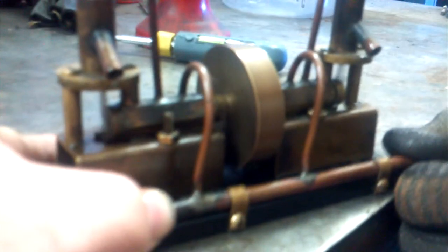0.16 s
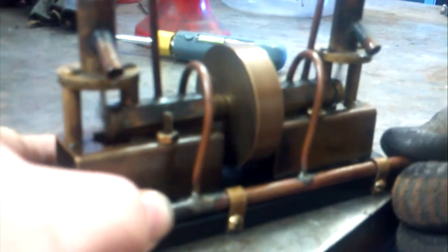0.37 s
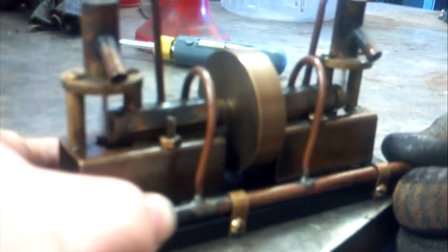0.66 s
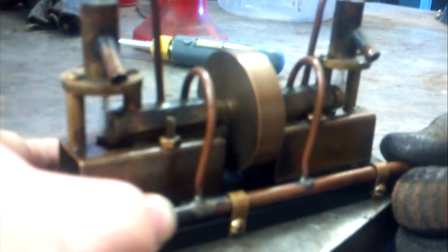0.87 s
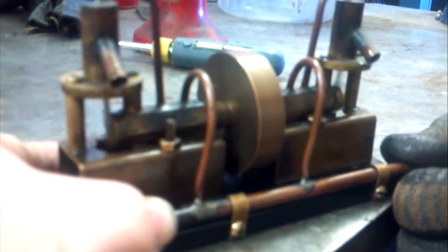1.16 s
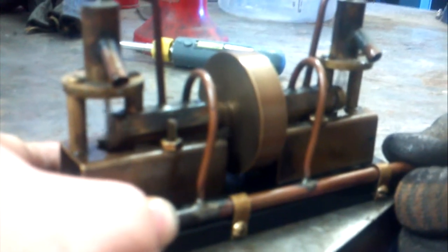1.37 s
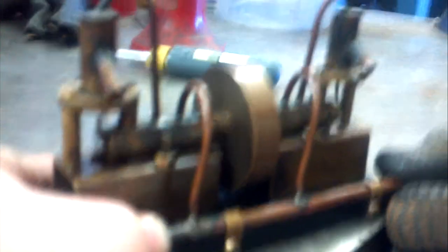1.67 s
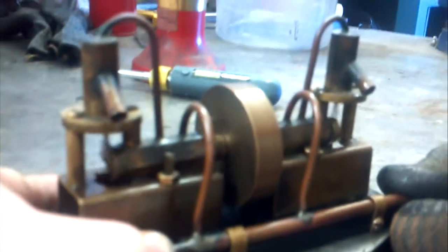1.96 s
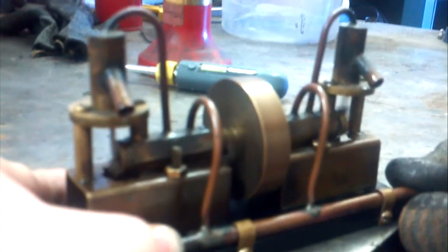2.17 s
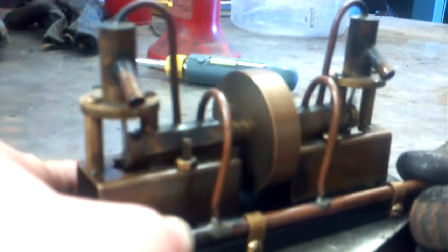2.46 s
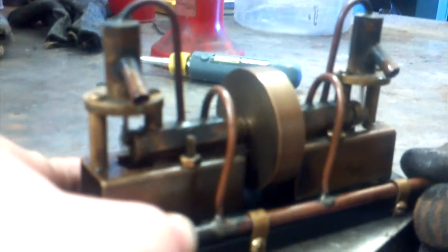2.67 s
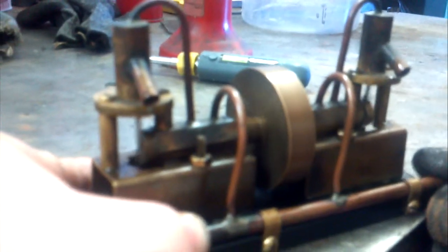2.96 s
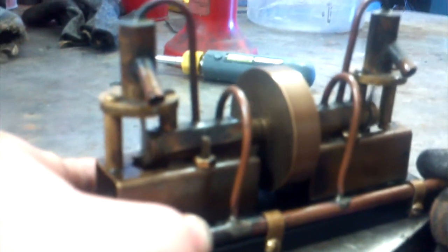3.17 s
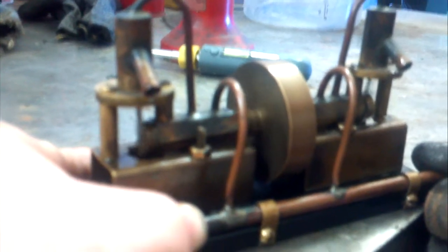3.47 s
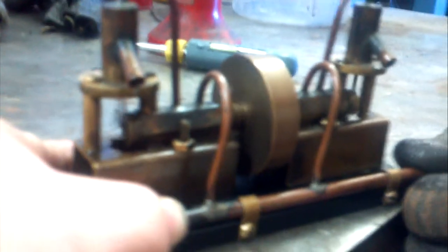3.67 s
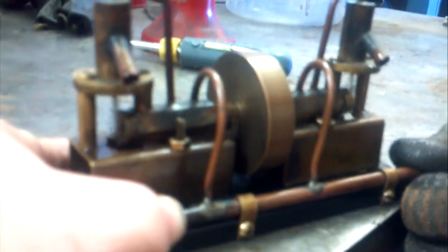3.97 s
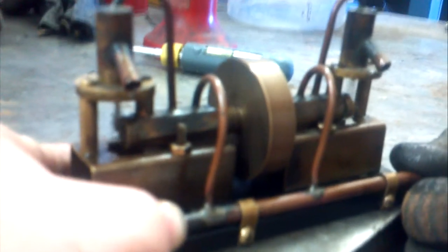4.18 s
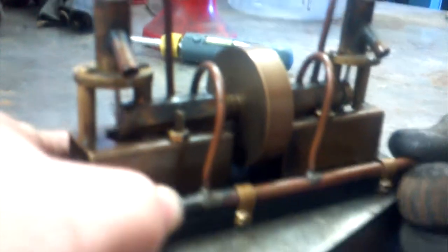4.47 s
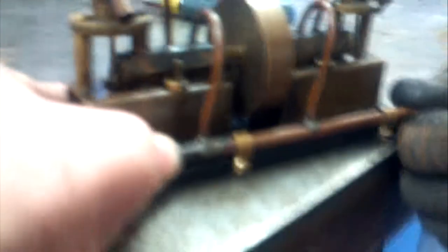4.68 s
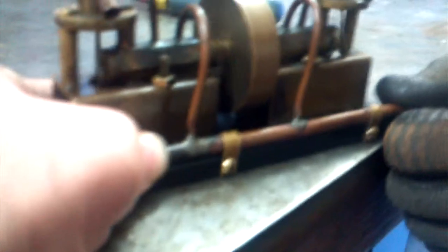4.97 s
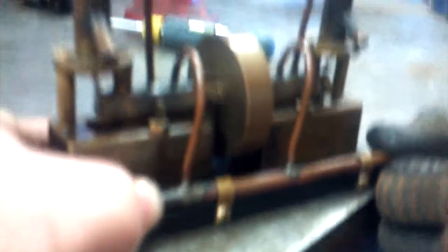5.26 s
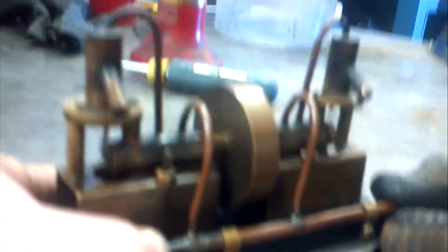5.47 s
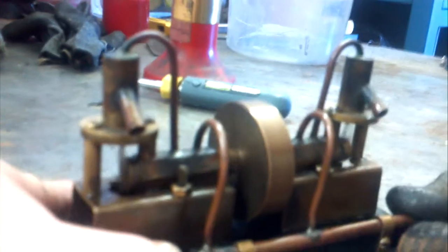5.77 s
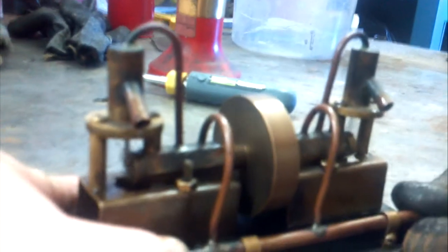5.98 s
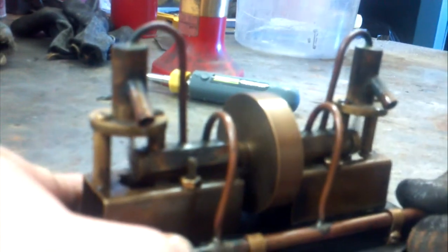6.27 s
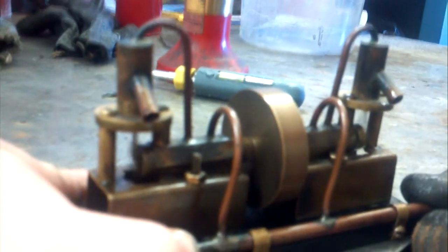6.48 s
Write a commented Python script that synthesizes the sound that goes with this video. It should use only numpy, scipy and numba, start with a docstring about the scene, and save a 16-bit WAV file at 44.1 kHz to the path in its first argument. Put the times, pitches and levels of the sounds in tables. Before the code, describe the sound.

Close on a workbench, a tiny two-cylinder engine runs on compressed air. Each turn gives a sharp spitting, whistling puff, a dull thump, then a softer hiss. The fast chuffing slows markedly by about two seconds, a hand knocks it and the leaking air flares briefly, then it accelerates steadily. Constant bright hiss and small linkage ticks continue; a faint whine rises near the end. Wide stereo, very close microphone.

```python
"""On a workshop bench, close to a phone with two microphone ports, a two-cylinder model engine runs on compressed air.
Each turn the near exhaust spits, whistles and shuts with a thump; half a turn later the far one hisses more softly.
The engine slows until 2.4 s, where a hand bumps it and the air leak swells briefly; then it picks up to the end.
From 5 s a faint whine climbs. Jets and leak are coloured noise, whistles noisy tones, knocks decaying modes;
linkage knocks, the leak's hiss and a low rumble run throughout."""
import sys
import numpy as np
from scipy import signal
from scipy.fft import rfft, irfft
from scipy.io import wavfile
from scipy.ndimage import uniform_filter1d
from numba import njit

SR = 44100
rng = np.random.default_rng(int(sys.argv[2]) if len(sys.argv) > 2 else 0)


def put_to_file(sound):
    """Save the sound as 16-bit audio at rate SR, in the file named by the first command-line argument."""
    columns = np.atleast_2d(sound).T  # one column per channel
    safe = np.clip(columns, -1, 1)
    whole_steps = np.round(safe * 32767)
    wavfile.write(sys.argv[1], SR, whole_steps.astype(np.int16))


N = 291845
TIME = np.arange(N) / SR
FREQ = np.fft.rfftfreq(N, 1 / SR)


def undb(db):
    """Amplitude of a level in dB."""
    return 10 ** (np.asarray(db) / 20)


def unit(x):
    """The sound scaled to rms 1."""
    return x / np.sqrt(np.mean(x ** 2, axis=-1, keepdims=True))


@njit
def svf(x, hz, width):
    """State-variable band-pass with a moving centre, gain 1 at the centre."""
    y, band, low = np.empty(len(x)), 0., 0.
    for i in range(len(x)):
        g, k = np.tan(np.pi * hz[i] / SR), width / hz[i]
        v = (band + g * (x[i] - low)) / (1 + g * (g + k))
        band, low, y[i] = 2 * v - band, low + 2 * g * v, k * v
    return y


def walk(rate):
    """Random levels held 1 / rate s and slewed twice; spread near 1."""
    hold = int(SR / rate)
    steps = np.repeat(rng.standard_normal(N // hold + 1), hold)
    return 1.18 * uniform_filter1d(uniform_filter1d(steps, hold), hold)[:N]


def over_log_frequency(points, column):
    """A table column interpolated over the logarithm of frequency."""
    points = np.array(points)
    return np.interp(np.log(FREQ + 1), np.log(points[:, 0]), points[:, column])


def shape(points, column=1):
    """Gain over frequency from (frequency [Hz], level [dB], ..) points."""
    return undb(over_log_frequency(points, column))


def resonances(modes):
    """Gain over frequency of (frequency [Hz], width [Hz], level [dB]) resonances whose powers add."""
    return np.sqrt(sum(undb(2 * db) / (1 + (2 * (FREQ - hz) / width) ** 2) ** 2 for hz, width, db in modes))


def hiss(gain):
    """Two unrelated noises of the same colour, rms 1."""
    return unit(irfft(rfft(rng.standard_normal((2, N))) * gain, N))


def whistle(hz, width_hz, pure_db=-40.0):
    """Two unrelated noisy tones that follow a pitch, with a steady core, rms 1."""
    skirt = []
    for _ in range(2):
        narrowed = svf(rng.standard_normal(N), hz, width_hz)
        skirt.append(svf(narrowed, hz, width_hz))
    core = np.sin(2 * np.pi * (np.cumsum(hz) / SR + rng.random((2, 1))))
    return unit(unit(np.array(skirt)) + undb(pure_db) * np.sqrt(2) * core)


def ring(times, db, hz, t60):
    """One short mode struck at the given times, each blow with its own level and pitch."""
    t, out = np.arange(int(.14 * SR)) / SR, np.zeros(N + SR)
    push_cycles = 0.34  # a blow builds over this share of a cycle of its mode
    decay = np.exp(-np.log(1000) * t / t60)
    for at, gain, f in zip(*np.broadcast_arrays(np.atleast_1d(times), undb(db), hz)):
        if 0 <= at * SR < N:
            push = 1 - np.exp(-f * t / push_cycles)
            out[int(at * SR):][:len(t)] += gain * push * np.sin(2 * np.pi * f * t) * decay
    return out[:N]


# crank speed; a turn starts as the near exhaust opens: (time [s], speed [turns/s])
SPEED = [(0, 15.858), (1.05, 14.656), (1.45, 13.024), (2.02, 8.023), (2.38, 6.101), (3.17, 9.793),
         (3.55, 10.804), (4.1, 12.575), (4.8, 13.339), (5.7, 15.906), (6.38, 16.471), (6.62, 17.487)]
START_TURN = .627  # share of a turn already done at 0 s


def crank():
    """Start time of every turn, and the crank angle in turns at every sample: the running sum of speed."""
    time = np.arange(-SR // 10, N + SR // 5) / SR  # begins 0.1 s early
    angle = np.cumsum(np.interp(time, *np.transpose(SPEED))) / SR
    angle += START_TURN - angle[SR // 10]
    angle_now = angle[SR // 10:][:N]
    return np.interp(np.arange(int(angle_now[-1]) + 3), angle, time), angle_now


# slow drift of the near exhaust, whistle pitch before its bend:
# (time [s], jet level [dB], whistle level [dB], whistle pitch [Hz])
NEAR_DRIFT = [(0, -20, -20, 5950), (0.251, -21, -20, 5700), (.5, -20, -18, 5950), (1.001, -21, -25, 5850),
              (1.14, -22.5, -17, 5500), (1.24, -21.5, -24, 6400), (1.7, -23, -23, 6450),
              (2.128, -19.5, -25, 6250), (2.27, -18.5, -19, 5250), (2.43, -18, -15.5, 7307),
              (2.58, -20.5, -15, 6750), (2.85, -19.5, -12, 6900), (3.2, -21.5, -17, 6450),
              (4.0, -19.5, -14, 6450), (4.25, -21.5, -21, 6000), (4.7, -21, -18, 6200),
              (5.0, -20, -15.5, 6500), (5.55, -20.5, -12.5, 6550), (5.849, -21.5, -20.5, 6050),
              (6.2, -21, -18, 6250), (6.62, -21, -16, 6450)]
# turn-to-turn spread: (open time [share of turn], jet [dB], whistle [dB], whistle pitch [ratio],
# far jet [dB], thump [dB])
TURN_SCATTER = (0.012, 0.5, 1.2, 0.015, 0.8, 0.5)
OPEN_SHARE, FAR_DB = .348, -30.5  # share of a turn that the near port stays open; far jet level
THUMP_DB, THUMP_DB_PER_OCTAVE = -47.5, 6  # at 15 turns a second; gain as the speed doubles


def turns(starts):
    """What each turn brings: open share, jet dB, whistle dB, whistle Hz, far jet dB, thump dB."""
    chance = rng.standard_normal((len(starts) - 1, len(TURN_SCATTER))).T * np.array(TURN_SCATTER)[:, None]
    at, *columns = np.transpose(NEAR_DRIFT)
    jet_db, whistle_db, hz = (np.interp(starts[:-1], at, c) for c in columns)
    thump_db = THUMP_DB + THUMP_DB_PER_OCTAVE * np.log2(1 / (15 * np.diff(starts)))
    return np.array([OPEN_SHARE + chance[0], jet_db + chance[1], whistle_db + chance[2],
                     hz * (1 + chance[3]), FAR_DB + chance[4], thump_db + chance[5]])


# jet and spit burst, sag, and keep a tail as the port shuts:
# (time [share of open time], jet level [dB], spit level [dB])
NEAR_PORT = [(-.07, -9, -18), (-.03, -6, -12), (.05, 2, -2), (.16, 1.2, 0), (.36, 3, -2), (.56, -0.5, -5.5),
             (.78, -2, -7.5), (.9, -4, -8), (1.0, -9, -18), (1.08, -10.5, -17.5)]
# colour of the broad jet: (frequency [Hz], width [Hz], level [dB])
NEAR_PIPE = [(4710, 440, -8), (5420, 480, 0), (6650, 970, 1.5), (12220, 1300, -0.5), (13700, 1550, 1),
             (16000, 1440, 3.5)]
# colour of the spit: (frequency [Hz], width [Hz], level [dB])
NEAR_SPIT = [(9550, 910, 5), (10670, 2600, 1)]
# the whistle climbs as the port narrows, then drops as it shuts: (time [share of open time], pitch [ratio])
WHISTLE_BEND = [(0, .96), (.58, .96), (.74, 1.01), (.9, .98), (1, .9)]
# the whistle swells late: peak as share of open time, slope per open time, floor of the swell
WHISTLE_PEAK, WHISTLE_RISE_DB, WHISTLE_EARLY_DB = 0.74, 49, -15
# a last low chirp as the port shuts: share of open time, level, fall per open time, pitch
SHUT_CHIRP_AT, SHUT_CHIRP_DB, SHUT_CHIRP_FALL_DB, SHUT_CHIRP_HZ = .85, -4.5, 150, 4885
WHISTLE_PURE_DB = -1.5  # steady tone at the core of the whistle, against its noisy skirt


def near_exhaust(angle, each):
    """Broad jet, a spit at opening and a port whistle that drops in pitch as the valve shuts."""
    turn = (angle + .05).astype(int)  # the air stirs a little before the port opens
    open_share, jet_db, whistle_db, hz = each[:4, turn]
    opened = (angle - turn) / open_share
    at, *columns = np.transpose(NEAR_PORT)
    jet, spit = (np.interp(opened, at, c) for c in columns)
    sputter = 1.3 * walk(400)  # turbulence breaks the jet into millisecond bursts
    out = undb(jet_db + jet + sputter) * hiss(resonances(NEAR_PIPE))
    out += undb(jet_db + spit + sputter) * hiss(resonances(NEAR_SPIT))

    chirp = SHUT_CHIRP_DB - SHUT_CHIRP_FALL_DB * np.abs(opened - SHUT_CHIRP_AT)
    chirp_hz = SHUT_CHIRP_HZ * (1 - 0.5 * np.clip(opened - SHUT_CHIRP_AT, -.2, .2))
    out += undb(jet_db + chirp) * whistle(chirp_hz, 1600.0, WHISTLE_PURE_DB)

    swell = np.maximum(1.5 - WHISTLE_RISE_DB * np.abs(opened - WHISTLE_PEAK), WHISTLE_EARLY_DB)
    gate = np.interp(opened, [-.08, 0.018, 1.37], [-30, -5.0, -1.0])
    gate = np.where(opened > .98, -41, gate)  # cut off as the port shuts
    pitch = hz * np.interp(opened, *np.transpose(WHISTLE_BEND)) * (1 + 0.013 * walk(200))
    level_db = whistle_db + swell + gate + 0.77 * walk(300)
    return out + undb(level_db) * whistle(pitch, 500.0, WHISTLE_PURE_DB)


# the far port over a turn, levels relative to each other:
# (time [share of turn], jet level [dB], pipe tone level [dB], whistle level [dB], whistle pitch [Hz])
FAR_PORT = [(.46, -30, -30, -30, 4300), (.5, -1, -1, -22, 4300), (.52, .5, 3, -20, 4300),
            (.57, -1, -.5, -19, 4350), (.65, -1, -3.5, -15, 4500), (.74, -1, 0, -11, 4900),
            (.8, 1.5, 1, -8, 6000), (.84, -3, -3, -7, 6900), (.88, -30, -30, -30, 7000)]
# colour of the far jet: (frequency [Hz], width [Hz], level [dB])
FAR_PIPE = [(12340, 1300, 21), (14600, 1000, 23)]


def far_exhaust(angle, each):
    """Softer jet with a steady pipe tone of narrow noise and a faint rising whistle."""
    turn = angle.astype(int)
    level_db = each[4, turn] + 1.3 * walk(280)
    at, *columns = np.transpose(FAR_PORT)
    jet, tone, chirp, hz = (np.interp(angle - turn, at, c) for c in columns)
    out = undb(jet - 0.5) * hiss(resonances(FAR_PIPE))
    out += undb(tone + 1.0) * hiss(resonances([(9910, 880, 0)]))
    out += undb(chirp + 3.0) * whistle(hz, 590.0)
    return undb(level_db) * out


def strike_each_turn(starts, share, strength_db, scatter_db, hz, t60):
    """One mode struck once a turn, with a little scatter in time and level."""
    period = np.diff(starts)
    chance = rng.standard_normal((2, len(period)))
    times = starts[:-1] + period * (share + 0.0024 * chance[0])
    return ring(times, strength_db + scatter_db * chance[1], hz, t60)


# pressure blows each turn, timing and pitch as at 15 turns a second: (time [share of turn],
# frequency [Hz], decay t60 [s], level over the thump level [dB], scatter [dB])
BLOWS = [(.31, 214, 0.037, 2.5, 1.5), (.31, 158, 0.044, 15, 1), (.31, 123, 0.05, 0, 1.5),
         (.97, 150, 0.045, 8, 3), (.12, 155, 0.035, 4, 1), (.53, 155, .03, -2, -1)]
BLOW_PITCH_LAW = 0.5  # blows ring lower as the engine slows: pitch goes with speed to this power
BLOW_LAG_PER_OCTAVE = 0.103  # blows land later in the turn as the speed halves, share of turn


def pressure_thumps(starts, thump_db):
    """Low modes pushed by the pressure blows; they ring lower and land later as the engine slows."""
    slowness = 15 * np.diff(starts)
    lag = BLOW_LAG_PER_OCTAVE * np.log2(slowness)
    pitch = slowness ** -BLOW_PITCH_LAW
    return sum(strike_each_turn(starts, share + lag, thump_db + db, scatter_db, hz * pitch, t60)
               for share, hz, t60, db, scatter_db in BLOWS)


# linkage knocks each turn: (time [share of turn], frequency [Hz], decay t60 [s],
# level at 15 turns a second [dB], scatter [dB])
KNOCKS = [(.868, 472, 0.02, -35, 0.5), (.87, 810, 0.013, -36, 1.5), (.47, 404, 0.021, -39, 2.5),
          (.335, 370, 0.015, -45, 1), (.4, 2250, 0.007, -36, 4.5)]


def linkage_knocks(starts):
    """Short modes struck near fixed crank angles; the knocks harden with speed."""
    speed_db = -14 * np.log10(15 * np.diff(starts))
    return sum(strike_each_turn(starts, share, speed_db + db, scatter_db, hz, t60)
               for share, hz, t60, db, scatter_db in KNOCKS)


def bench(blows):
    """The bench radiates little of the thumps and knocks below 84 Hz: a steep high-pass."""
    return signal.sosfilt(signal.butter(4, 84, "high", fs=SR, output="sos"), blows)


# modes struck by a hand bump: (time [s], frequency [Hz], decay t60 [s], level [dB])
HAND_BUMP = [(2.105, 480, .025, -36), (2.106, 690, .02, -38), (2.255, 426, 0.028, -34),
             (2.41, 286.2, 0.056, -31.5), (2.431, 560, 0.018, -36), (2.442, 130, 0.029, -27)]


def hand_bump():
    """A hand bumps the engine: a few single decaying modes."""
    return sum(ring(at, db, hz, t60) for at, hz, t60, db in HAND_BUMP)


# drift of the leak, before fixed offsets: (time [s], body level [dB], treble level [dB])
LEAK = [(0, -41, -34), (1.0, -40, -33.5), (1.45, -42.5, -38), (1.88, -43.5, -39), (2.0, -41, -37),
        (2.3, -38.5, -34.5), (2.6, -39, -36.5), (3.6, -38.5, -34), (4.4, -40, -35), (5.099, -39, -33.5),
        (6.0, -39.5, -35.5), (6.62, -38.5, -34)]
# broad colour of the body: (frequency [Hz], level [dB])
LEAK_BODY = [(40, -27), (90, -16), (130, -9), (300, -4), (700, -6), (1200, -9), (1900, -2.5), (2250, -1.5),
             (2750, -6.5), (3050, -1.5), (3400, -.5), (3700, 0), (4100, -1.5), (5000, -6.5)]
# ringing of the hollow base: (frequency [Hz], width [Hz], level [dB])
LEAK_RINGS = [(620, 90, -18), (937, 45, -14), (1065, 90, -11), (1478, 90, -12.5), (1700, 260, -11),
              (2150, 300, -11)]
# colour of the treble hiss: (frequency [Hz], level [dB])
LEAK_TREBLE = [(3800, -28.5), (4800, 4.5), (6200, 10), (8000, 7), (9900, 11.5), (11500, 10.5), (13500, 1),
               (16000, 2.5)]
# gain on the leak's lows: (time [s], level [dB])
LEAK_LOWS = [(0, 3.5), (1.8, 2), (2.1, -1.5), (3.6, -2), (4.5, -1), (6.62, -1)]
# start and end of the swell while the engine is slowest: (start [s], end [s])
GUST_S = (2.33, 2.435)
GUST_BODY_DB, GUST_TREBLE_DB, GUST_EDGE_S = 3.2, 11, 0.012


def leak():
    """Steady escaping air, wavering a little: a body coloured by the hollow base, and a treble hiss."""
    at, body_db, treble_db = np.transpose(LEAK)
    gust = np.clip(np.minimum(TIME - GUST_S[0], GUST_S[1] - TIME) / GUST_EDGE_S + .5, 0, 1)
    body = hiss(shape(LEAK_BODY)) + hiss(resonances(LEAK_RINGS)) * undb(-11)
    lows = signal.sosfilt(signal.butter(2, 1100, fs=SR, output="sos"), body)  # under 1100 Hz
    body = body + lows * (undb(np.interp(TIME, *np.transpose(LEAK_LOWS))) - 1)
    body *= undb(np.interp(TIME, at, body_db) + GUST_BODY_DB * gust + 5.5 + 1.27 * walk(45))

    treble_gust_db = GUST_TREBLE_DB * gust * np.interp(TIME, GUST_S, [0.4, 1])  # the gust grows
    treble_level_db = np.interp(TIME, at, treble_db) + treble_gust_db + 3.5 + 2.14 * walk(40)
    return body, hiss(shape(LEAK_TREBLE)) * undb(treble_level_db)


# faint whine, pitch of the upper tone, level before an offset: (time [s], frequency [Hz], level [dB])
WHINE = [(5.1, 700, -80), (5.6, 724, -60), (6.1, 750, -58), (6.62, 780, -58)]


def whine():
    """Two thin sine tones about a third apart that rise together."""
    at, hz, db = np.transpose(WHINE)
    phase = 2 * np.pi * np.cumsum(np.interp(TIME, at, hz)) / SR
    level_db = np.interp(TIME, at, db) - 0.3 + .8 * walk(6)
    return undb(level_db) * (np.sin(phase) + 1.3 * np.sin(0.823 * phase))


# colour of the rumble: (frequency [Hz], level [dB])
RUMBLE = [(20, 3), (100, -10), (300, -12), (1000, -64)]
RUMBLE_DB, RUMBLE_DB_PER_OCTAVE = -71, 3  # rms at 15 turns a second; gain as the speed doubles


def rumble():
    """A faint low rumble of noise, unlike in the two channels, that grows with the speed."""
    speed = np.interp(TIME, *np.transpose(SPEED))
    return undb(RUMBLE_DB + RUMBLE_DB_PER_OCTAVE * np.log2(speed / 15)) * hiss(shape(RUMBLE))


def ports(pair, rear, lead=0):
    """The front port hears the first sound; the rear hears it shaded and shifted, plus scattered like sound."""
    phase = over_log_frequency(rear, 3) + 2 * np.pi * FREQ * lead / SR
    shared = rfft(pair[0]) * shape(rear) * np.exp(1j * phase)
    scattered = rfft(pair[1]) * shape(rear, column=2)
    return np.array([pair[0], irfft(shared + scattered, N)])


# rear microphone port against the front, for jets and treble hiss:
# (frequency [Hz], shared level [dB], unrelated level [dB], phase of shared part [rad])
REAR_JET = [(4500, -8, -3, 0), (5600, -10, -7, 0), (6200, -6, -11, 0), (7600, -13, -5, 0),
            (9000, -14, -7, 0), (10300, -11.5, -10, 0), (16000, -10.5, -8, 0)]
# the same for the leak's body, thumps, knocks and whine:
# (frequency [Hz], shared level [dB], unrelated level [dB], phase of shared part [rad])
REAR_BODY = [(30, -6, -2, 0), (130, -3.5, -10, -.42), (350, -3, -6, -.3), (500, -7, -8, -.3),
             (800, -6, -10, .2), (1100, -3, -7, 1.), (1650, -3, -2, -1.6), (2000, -5, -4, -2.3),
             (2300, -5, -4, -2.8), (2420, -1.5, -12, -3.1), (2560, -1, -14, -3.14), (2630, 0, -34, -3.14),
             (2880, 0, -34, -3.14), (2960, -3, -7, -3.1), (3120, -6, -3, -3.1), (3500, -8, -2, -3.1),
             (5000, -10, -2, -3.1)]
JET_LEAD = 16.3  # samples by which the rear port hears the jets first


def scene():
    """The engine and its leak on the bench, as heard at the front and rear microphone ports."""
    starts, angle = crank()
    each = turns(starts)
    body, treble = leak()
    jets = undb(-2.0) * (near_exhaust(angle, each) + far_exhaust(angle, each)) + treble
    body[0] += bench(pressure_thumps(starts, each[5]) + linkage_knocks(starts))
    body[0] += hand_bump() + whine()
    return ports(jets, REAR_JET, JET_LEAD) + ports(body, REAR_BODY)


# the delayed port cancels less well in the treble: (frequency [Hz], level [dB])
BEAM_MATCH = [(4500, 0), (5300, -1.5), (9000, -1.5), (16000, -0.5)]
BEAM_DELAY, TOP_HZ = 16, 15750  # samples; upper band edge
RIGHT_DB = 0.15  # the right channel is a little louder


def record(dry):
    """Each channel is one port minus the other delayed, which widens the image; a low rumble joins, the top is cut."""
    late = np.pad(dry[::-1], ((0, 0), (BEAM_DELAY, 0)))[:, :N]
    late = irfft(rfft(late) * shape(BEAM_MATCH), N)
    wide = (dry - late + rumble()) * undb([[-RIGHT_DB / 2], [RIGHT_DB / 2]])
    return signal.sosfilt(signal.ellip(12, .2, 75, TOP_HZ, fs=SR, output="sos"), wide)


dry = scene()
out = record(dry)
put_to_file(out)
```